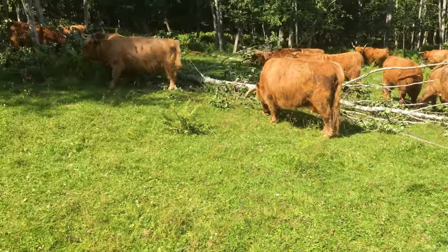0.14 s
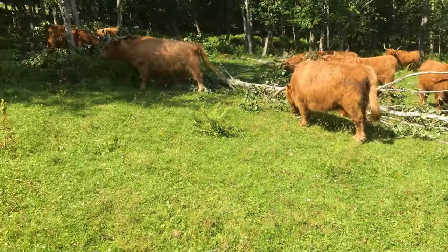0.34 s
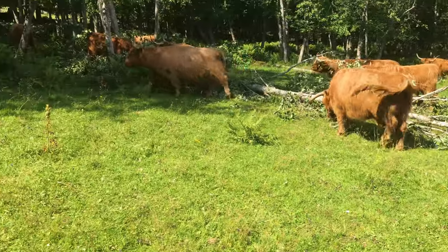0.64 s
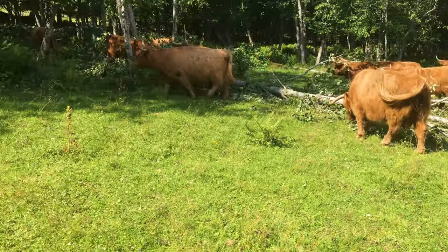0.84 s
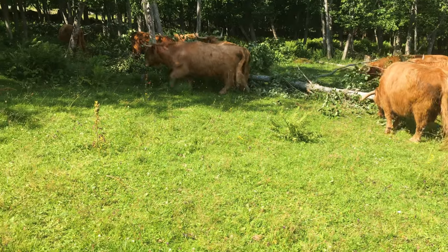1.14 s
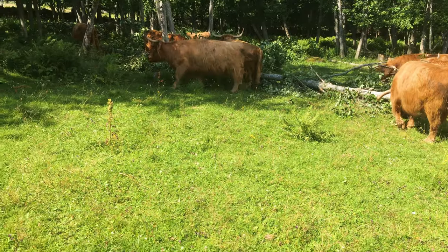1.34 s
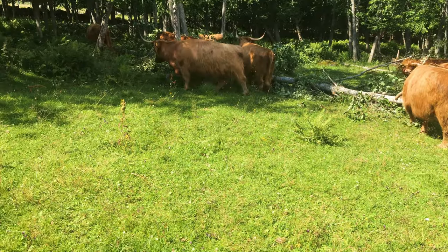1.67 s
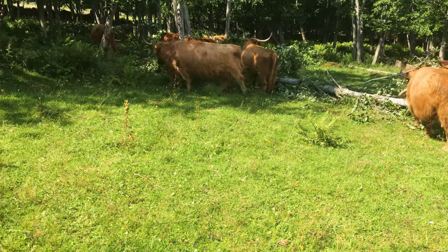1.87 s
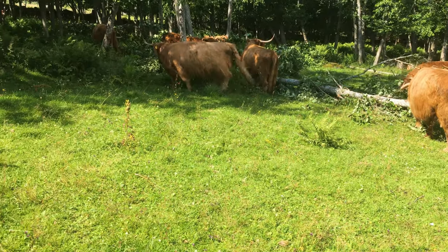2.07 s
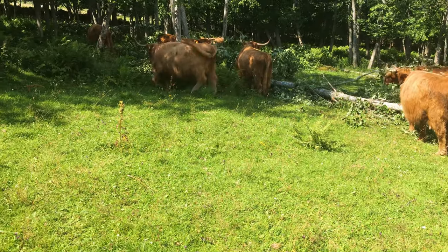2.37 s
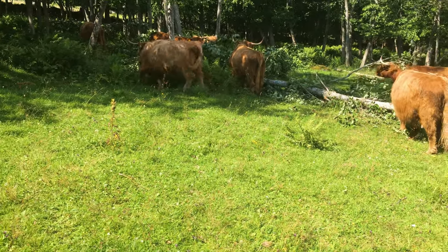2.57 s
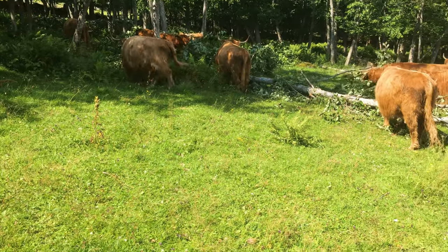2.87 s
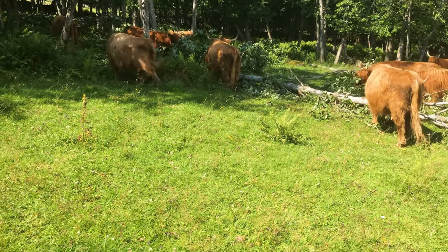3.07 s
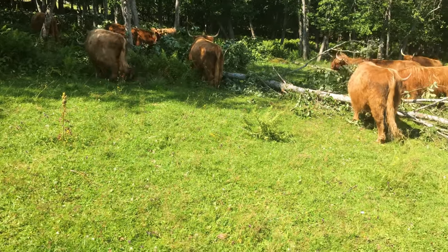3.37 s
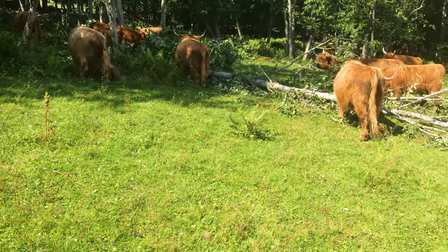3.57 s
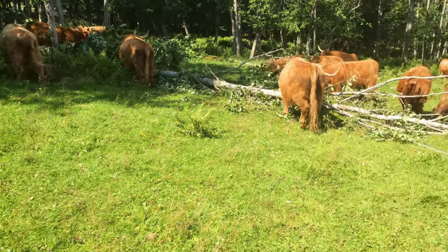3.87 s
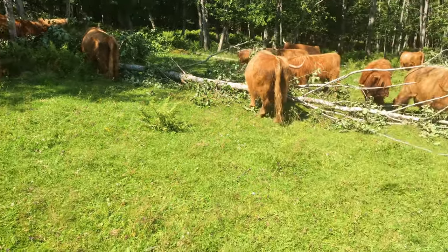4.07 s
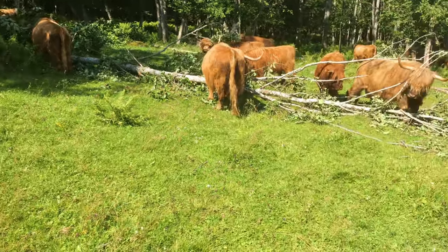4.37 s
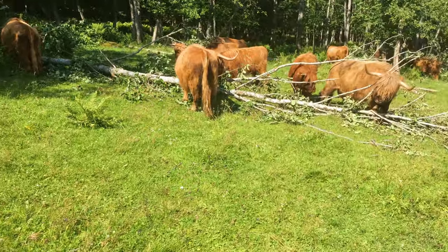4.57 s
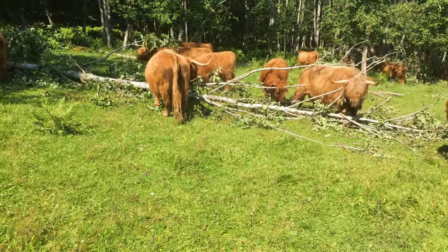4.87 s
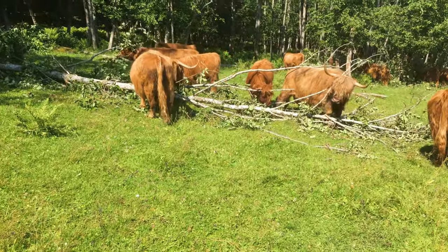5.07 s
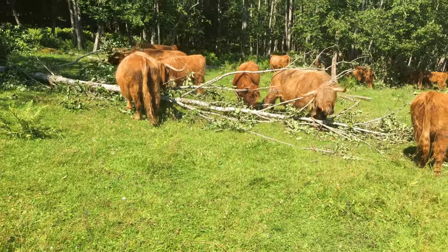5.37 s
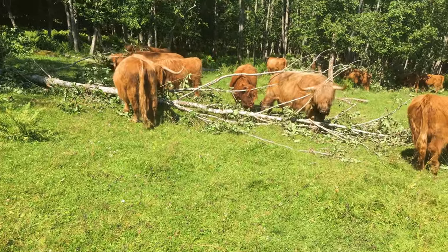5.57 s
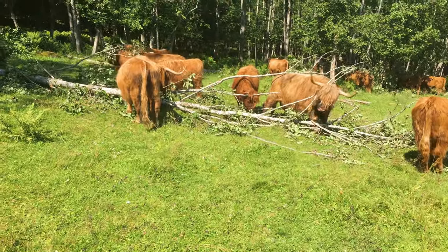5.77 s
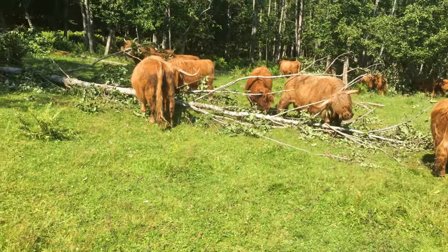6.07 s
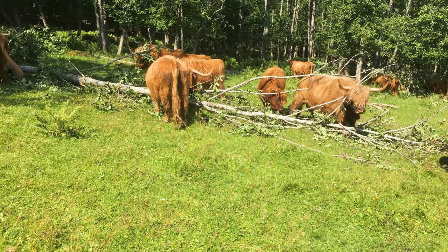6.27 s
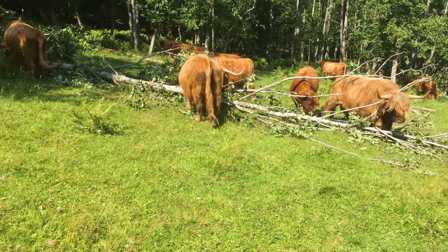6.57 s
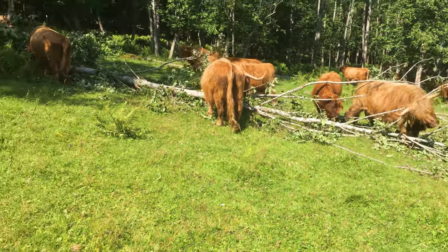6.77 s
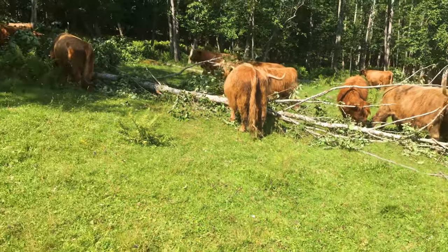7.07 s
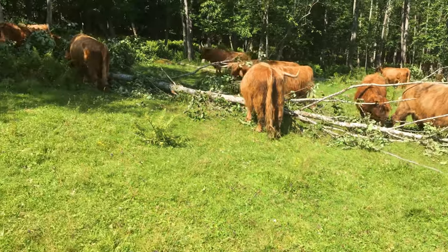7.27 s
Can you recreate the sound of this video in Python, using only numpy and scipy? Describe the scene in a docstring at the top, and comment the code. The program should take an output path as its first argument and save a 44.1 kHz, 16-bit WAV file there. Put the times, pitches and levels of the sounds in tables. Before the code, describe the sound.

Outdoors at a woodland edge, a herd browses on fallen branches. Continuous leaf rustle rises and falls with each pull, over faint wind rumble and muffled hoof treads. Hollow wooden clacks and brittle snaps break through irregularly: a sharp crack at the start, busy knocking in the middle, a quieter gap, then more cracks and thumps towards the end. The sound is mono-like, natural, with a slight dull tail from the trees.

```python
"""Pasture at the edge of a wood: cattle browse on felled leafy trees, in light air.
Foliage swishes under each tug (coloured noise and ringing leaf grains), stalks tick as they tear.
Hooves shuffle on turf (noise in timed swells); limbs knock dully and dry twigs snap (bursts into resonances).
The wood returns a faint tail of knocks and snaps. Both channels are the same."""
import sys
import numpy as np
from scipy import signal
from scipy.fft import rfft, irfft, next_fast_len
from scipy.io import wavfile

SR = 44100
rng = np.random.default_rng(int(sys.argv[2]) if len(sys.argv) > 2 else 0)


def master_out(mix):
    """Clip the mix to full scale and print it as 16-bit PCM to the path in sys.argv[1]."""
    frames = np.transpose(np.atleast_2d(mix))
    ceiling = np.clip(frames, -1, 1)
    pcm = np.round(ceiling * 32767).astype(np.int16)
    wavfile.write(sys.argv[1], SR, pcm)


N = 328104


def from_db(db):
    """Decibels to gain."""
    return 10 ** (np.asarray(db) / 20)


def rms_one(x):
    """Scale to unit rms."""
    return x / np.sqrt(np.mean(x ** 2) + 1e-20)


def unit_energy(x):
    """Scale to the energy of one unit click."""
    return x / np.sqrt(np.sum(x ** 2))


def with_level(x, db, seconds):
    """Give a blow the energy of a sound of that level and length."""
    return x * from_db(db) * np.sqrt(seconds * SR / np.sum(x ** 2))


def add(out, start_s, sound):
    """Mix a sound in at its start time."""
    start = max(round(start_s * SR), 0)
    out[start:start + len(sound)] += sound[:N - start]


def gain_at(spectrum, hz):
    """Gain of a spectrum, joined on a log-frequency axis."""
    points_hz, level_db = np.transpose(spectrum)
    return from_db(np.interp(np.log(hz + 1), np.log(points_hz), level_db))


def colour(x, spectrum):
    """Causal (minimum-phase) filter with the given spectrum, by folding the cepstrum."""
    size = 2 * next_fast_len(len(x))
    bins_hz = np.arange(size // 2 + 1) * SR / size
    cepstrum = irfft(np.log(gain_at(spectrum, bins_hz)))
    cepstrum[1:size // 2] *= 2
    cepstrum[size // 2 + 1:] = 0
    response = np.exp(rfft(cepstrum))
    return irfft(rfft(x, size) * response)[:len(x)]


def lowpass(x, order, hz):
    """Butterworth low-pass, corner held below SR / 3."""
    return signal.sosfilt(signal.butter(order, min(hz, SR / 3), fs=SR, output="sos"), x)


def resonate(x, hz, q):
    """One resonance, hz / q wide."""
    r = np.exp(-np.pi * hz / q / SR)
    return signal.lfilter([1, 0, -1], [1, -2 * r * np.cos(2 * np.pi * hz / SR), r * r], x)


def drift(rate_hz):
    """Smooth chance of unit rms, heading for a new random value rate_hz times a second."""
    knots = rng.standard_normal(4000)
    return rms_one(np.interp(np.arange(N) / SR * rate_hz, np.arange(len(knots)), knots))


def burst(t, t60_s):
    """Noise that starts at once and dies away."""
    return rng.standard_normal(len(t)) * from_db(-60 * t / t60_s)


def swells(peak_s, rise_s, fall_s, levels_db, floor_db):
    """Level in dB of swells over a floor: each grows until its peak and dies away; powers add."""
    roundness = 1.18  # top of a swell: 1 pointed, 2 bell-shaped
    t = np.arange(0, N, 128)[:, None] / SR
    distance = np.maximum((peak_s - t) / rise_s, (t - peak_s) / fall_s)
    envelopes = np.exp(-distance ** roundness)
    power = from_db(floor_db) ** 2 + envelopes ** 2 @ from_db(levels_db) ** 2
    return np.interp(np.arange(N) / SR, t[:, 0], 10 * np.log10(power))


def air(gust_db):
    """Light wind: a low rumble and the faint hush of the trees, as noise of drifting level."""
    # wind spectrum: f/Hz, relative level/dB
    air_spectrum = [(20, -38), (35, -17), (52, 2.5), (80, -3.5), (130, -7.5), (250, -13.5), (500, -19),
                    (1000, -19.5), (2000, -17.5), (5000, -20), (16000, -59)]
    level_db = -62 + gust_db * drift(rate_hz=5.7)
    return from_db(level_db) * rms_one(colour(rng.standard_normal(N), air_spectrum))


def pulling():
    """Each tug swells as the spray bends and settles once let go: dB of swish, leaf edges, bough drag."""
    # tugs at sprays: hardest pull t/s, swell/s, settle/s, swish level/dB,
    # crisp leaf edges re swish/dB, bough drag re swish/dB; levels before the layer trims
    tug_rows = [(-0.004, 0.036, 0.035, -58, -5, -14.5), (0.287, 0.073, 0.12, -51.5, -8.5, -8.5),
                (0.456, 0.034, 0.19, -60.0, -9, -5.0), (0.609, 0.008, 0.024, -44.5, -6, -6),
                (0.674, 0.034, 0.215, -53.0, -6.5, -12), (1.172, 0.013, 0.16, -60.5, -3.5, -5),
                (1.506, 0.026, 0.073, -54, -9, -3.0), (1.651, 0.06, 0.136, -52.5, -10, -10.5),
                (1.984, 0.013, 0.2, -57.5, -5.5, -3), (2.276, 0.19, 0.17, -54.5, -10, -4.5),
                (2.493, 0.076, 0.15, -53.5, -13.0, -7), (2.664, 0.075, 0.106, -53.5, -14.0, -3.0),
                (2.785, 0.026, 0.18, -54, -19, -6), (3.412, 0.036, 0.046, -54, -6, -9),
                (3.56, 0.17, 0.2, -53, -13, -5), (3.657, 0.046, 0.038, -52, -7, -11),
                (4.116, 0.079, 0.28, -56, -11, -2.5), (4.37, 0.068, 0.066, -49, -7.5, -5.5),
                (4.666, 0.012, 0.033, -67, 5, -10.5), (5.152, 0.32, 0.21, -53.0, -8.5, -5.0),
                (5.344, 0.055, 0.083, -53.0, -12.0, -21), (5.715, 0.26, 0.083, -56, -7.5, -2),
                (5.849, 0.063, 0.24, -49.5, -8, -3.5), (6.155, 0.091, 0.19, -60.5, -7, 3.5),
                (6.326, 0.073, 0.099, -53.0, -7, -12), (6.439, 0.058, 0.121, -56, -7.0, -7),
                (6.768, 0.39, 0.12, -57.5, -7.0, -3.5), (7.126, 0.046, 0.154, -59.5, -9, -8),
                (7.361, 0.16, 0.12, -54.5, -8.5, -7)]
    # the rest of the herd keeps the leaves astir; crisp and drag re the floor
    floor_db, floor_crisp_db, floor_drag_db = -61.5, -11.5, -6
    peak_s, rise_s, fall_s, swish_db, crisp_db, drag_db = np.transpose(tug_rows)
    return (swells(peak_s, rise_s, fall_s, swish_db, floor_db),
            swells(peak_s, rise_s, fall_s, swish_db + crisp_db, floor_db + floor_crisp_db),
            swells(peak_s, rise_s, fall_s, swish_db + drag_db, floor_db + floor_drag_db))


def leaf_grains(per_s, spread_db, hiss_db):
    """Countless leaves brush into a hiss; single leaves flick out of it, each at one of 12 pitches."""
    sizes = from_db(spread_db * np.minimum(rng.exponential(1, N), 4)) * rng.choice([-1, 1], N)
    flicks = sizes * (rng.random(N) < per_s / SR)
    pitches_hz = np.geomspace(2200, 14000, 12)
    dealt = rng.choice(len(pitches_hz), N, p=pitches_hz / pitches_hz.sum())
    grains = 0
    for k, hz in enumerate(pitches_hz):
        grains = grains + resonate(flicks * (dealt == k) + 1e-18, hz, q=5.5)
    return rms_one(grains) + from_db(hiss_db) * rng.standard_normal(N)


def foliage(pull, flutter_db, swish_trim_db, crisp_trim_db, drag_trim_db):
    """A harder pull makes more leaves touch; the level flutters as the sprays swing."""
    # spectra of swish, crisp leaf edges, bough drag: f/Hz, relative level/dB
    leaf_spectrum = [(500, -23), (1300, -7), (2100, -2.5), (3000, -1.5), (4000, 0.5), (4900, -3),
                     (6000, 0.5), (7500, -3), (9200, -1.5), (10500, -13), (16000, -33)]
    edge_spectrum = [(5000, -20), (8500, -4), (10400, -2.5), (11800, 1), (14000, -3.5), (16000, -4.5)]
    bough_spectrum = [(200, -17), (600, 2.5), (1200, 0.5), (2000, 0.5), (3500, -23.5), (10000, -36)]
    swish_db, crisp_db, drag_db = pull
    per_s = 4000 * from_db(swish_db - swish_db.mean())
    flutter = from_db(flutter_db * drift(rate_hz=90))
    layers = [(swish_db + swish_trim_db, leaf_spectrum),
              (crisp_db + crisp_trim_db, edge_spectrum),
              (drag_db + drag_trim_db, bough_spectrum)]
    out = 0
    for level_db, spectrum in layers:
        grains = leaf_grains(per_s, spread_db=3.0, hiss_db=5.0) * flutter
        out = out + from_db(level_db) * rms_one(colour(grains, spectrum))
    return out


def leaf_ticks(pull, per_s, spread_db, tick_db):
    """Now and then a leaf stalk tears with a tiny bright tick, more often under a hard pull."""
    # spectrum of a tearing stalk: f/Hz, relative level/dB
    tick_spectrum = [(800, -27), (3000, 0), (6000, -9), (10000, -2), (16000, -7)]
    swish_db = pull[0]
    torn = rng.random(N) < per_s * from_db(swish_db - swish_db.mean()) / SR
    sizes = from_db(tick_db + spread_db * rng.uniform(-1, 1, N)) * rng.choice([-1, 1], N)
    tear = unit_energy(burst(np.arange(SR // 100) / SR, t60_s=0.008))
    return colour(signal.fftconvolve(torn * sizes, tear)[:N], tick_spectrum)


def stepping():
    """Every hoof presses and releases alike: dB of tread and of rumble."""
    # hooves taking weight: t/s, tread level/dB, deep rumble level/dB; levels before the layer trims
    step_rows = [(0.02, -62.5, -58), (0.28, -58.5, -56.5), (0.38, -59, -56.5), (0.56, -48, -60),
                 (0.68, -48.5, -52.5), (1.0, -57, -56.5), (1.31, -56, -55), (1.54, -53, -55),
                 (1.87, -58.5, -59), (2.04, -49, -67), (2.2, -62, -53.0), (2.31, -56, -53.5),
                 (2.43, -60, -59.0), (2.5, -49, -64.5), (2.67, -52, -55.5), (2.78, -65, -59),
                 (2.95, -55, -57), (3.19, -57.5, -74), (3.47, -50.5, -60.5), (3.72, -80, -66),
                 (3.96, -64, -60.5), (4.12, -49.5, -67), (4.21, -55.5, -56.5), (4.34, -56.0, -63),
                 (4.59, -62.5, -59), (4.93, -60.0, -68), (5.08, -59, -61.5), (5.24, -55, -58),
                 (5.55, -55, -57), (5.68, -51, -61.0), (5.84, -51.0, -56), (6.0, -53.5, -56.5),
                 (6.17, -60, -54.0), (6.34, -51.5, -64.5), (6.42, -57, -60.5), (6.64, -56, -55.5),
                 (6.78, -54, -60.5), (6.94, -73, -58.5), (7.11, -70, -78), (7.34, -57.5, -67.5)]
    press_s, release_s = 0.046, 0.068
    tread_floor_db, rumble_floor_db = -66, -72.5  # far cattle shifting their weight
    peak_s, tread_db, rumble_db = np.transpose(step_rows)
    return (swells(peak_s, press_s, release_s, tread_db, tread_floor_db),
            swells(peak_s, press_s, release_s, rumble_db, rumble_floor_db))


def shuffling(lumps_db, tread_trim_db, rumble_trim_db):
    """Hooves and flanks press on soft turf: an uneven low murmur over a deep rumble."""
    # spectra of turf and rumble: f/Hz, relative level/dB
    turf_spectrum = [(60, -17.5), (130, -2), (200, 1.5), (320, -2), (460, -6), (530, -16), (750, -19),
                     (2000, -36), (8000, -72)]
    rumble_spectrum = [(20, -21), (38, -7), (54, 1), (100, -1.5), (150, -8), (300, -21), (2000, -81)]
    tread_db, rumble_db = stepping()
    lumps = from_db(lumps_db * drift(rate_hz=40))
    murmur = rms_one(colour(rng.standard_normal(N) * lumps, turf_spectrum))
    deep = rms_one(colour(rng.standard_normal(N) * lumps, rumble_spectrum))
    return from_db(tread_db + tread_trim_db) * murmur + from_db(rumble_db + rumble_trim_db) * deep


def strike(t, t60_s, click_db):
    """A single sharp click leading a burst of fine debris; click_db weighs one against the other."""
    return unit_energy(burst(t, t60_s)) + from_db(click_db) * (t == 0) * rng.choice([-1, 1])


def stick(shake, hz, q, ratio, other_db):
    """A piece of wood rings at its pitch and, more weakly, at one other bending mode."""
    other = resonate(shake, min(ratio * hz, SR / 3), q)
    return resonate(shake, hz, q) + from_db(other_db) * other


def thud(t, pitch_hz, t60_s, swell_cycles, low_linger, mode_q, focus_db):
    """The limb's modes, strongest near the blow's pitch; low ones build up later and last longer."""
    # low modes of a heavy limb: f/Hz, level before focus/dB
    limb_modes = [(90, -7), (130, 0.5), (185, 0.5), (240, -1), (275, -4), (325, -1.5), (368, -0.5),
                  (415, 0), (460, 1), (560, -7.5), (650, 2.5), (800, -10.5), (980, 5.5)]
    out = 0
    for hz, level_db in limb_modes:
        build_up = 1 - np.exp(-t * hz / swell_cycles)
        shake = burst(t, t60_s * (pitch_hz / hz) ** low_linger) * build_up
        mode = resonate(resonate(shake, hz, mode_q), hz, q=0.96)
        off_pitch_octaves = np.log2(hz / pitch_hz)
        out = out + rms_one(mode) * from_db(level_db - focus_db * off_pitch_octaves ** 2)
    return out


def knocks(clack_t60_s, clack_width_hz, scuff_db, thud_trim_db, clack_trim_db):
    """Limbs knock on trunks and under hooves: the bark clacks, the heavy limb sounds its low thud."""
    # knocks: t/s, thud level/dB, clack level/dB, clack f/Hz, thud f/Hz, t60 of scuff and of thud at its f/s;
    # levels before the trims
    knock_rows = [(0.265, -43, -50, 740, 290, 0.074), (0.352, -48, -49.5, 1010, 366, 0.17),
                  (0.543, -47, -61, 755, 257, 0.045), (0.68, -52, -63, 2300, 270, 0.1),
                  (0.705, -48.5, -53, 750, 305, 0.39), (0.864, -53, -54.5, 1350, 287, 0.11),
                  (1.039, -54, -69, 810, 250, 0.14), (1.453, -49, -59, 910, 320, 0.21),
                  (1.532, -42, -46.5, 730, 424, 0.066), (1.79, -53, -60, 745, 480, 0.31),
                  (1.9866, -41.5, -37, 1280, 540, 0.15), (2.271, -42.5, -42.5, 1030, 454, 0.2),
                  (2.436, -45.5, -42.5, 920, 450, 0.18), (2.472, -47, -47, 750, 380, 0.12),
                  (2.492, -40, -48, 755, 365, 0.19), (2.505, -53, -45, 870, 360, 0.17),
                  (2.523, -40, -44, 764, 350, 0.095), (2.65, -45, -39, 1000, 268, 0.053),
                  (2.773, -50, -47, 1700, 450, 0.048), (2.953, -47.5, -71, 2450, 240, 0.13),
                  (3.131, -57.5, -54, 1730, 310, 0.16), (3.459, -53.5, -59, 2050, 288, 0.051),
                  (3.529, -48.5, -38.5, 1970, 318, 0.075), (4.0905, -49.5, -41, 1540, 310, 0.056),
                  (4.188, -51, -61, 2230, 340, 0.05), (4.286, -52, -52.5, 884, 340, 0.22),
                  (4.826, -56.5, -53.5, 1140, 300, 0.077), (4.887, -59, -54, 1130, 310, 0.084),
                  (4.951, -49.5, -68, 750, 380, 0.055), (5.319, -69, -41.5, 1850, 360, 0.14),
                  (5.403, -49.5, -66, 1960, 380, 0.048), (5.55, -49.5, -54.5, 780, 290, 0.05),
                  (5.67, -43.5, -51, 900, 288, 0.07), (5.82, -60, -48, 2100, 340, 0.05),
                  (5.828, -41.5, -41.5, 1060, 343, 0.13), (5.86, -57, -66, 2330, 270, 0.12),
                  (6.025, -62, -51.5, 1560, 290, 0.12), (6.151, -54, -55, 900, 350, 0.049),
                  (6.623, -48.5, -49.5, 1100, 266, 0.12), (6.721, -42.5, -39, 1180, 384, 0.085),
                  (6.787, -52, -51, 1670, 260, 0.068), (7.318, -46, -41.5, 1200, 438, 0.088)]
    out, t = np.zeros(N), np.arange(SR // 4) / SR
    for start_s, thud_db, clack_db, clack_hz, thud_hz, t60_s in knock_rows:
        scuff = from_db(scuff_db) * unit_energy(burst(t, t60_s))
        shake = strike(t, clack_t60_s, click_db=-3) + scuff
        # all clacks ring about equally long, so the high ones are the most clearly pitched
        clack = stick(shake, clack_hz, clack_hz / clack_width_hz, ratio=0.62, other_db=-13.0)
        clack = lowpass(clack, order=2, hz=3.9 * clack_hz)
        body = thud(t, thud_hz, t60_s, swell_cycles=0.037, low_linger=0.83, mode_q=7.5, focus_db=6.5)
        knock = with_level(clack, clack_db + clack_trim_db, seconds=0.0094)
        add(out, start_s, knock + with_level(body, thud_db + thud_trim_db, seconds=0.024))
    return out


def snaps(crack_t60_s, tail_t60_s, tail_trim_db, ring_trim_db, crack_trim_db):
    """A dry fibre parts in a sharp crack, splinters fizz on after it, and the twig rings briefly."""
    # breaking wood fibres: t/s, twig ring level/dB, twig f/Hz, ring Q, crack level/dB,
    # splinter tail re debris burst/dB; levels before the trims
    snap_rows = [(0.3075, -40.5, 4240, 6.9, -52, 7), (0.421, -42, 7900, 5, -51, -5),
                 (0.4326, -42, 9200, 3.7, -41, -7), (0.5948, -31, 11200, 5, -25.5, 2),
                 (0.5987, -43, 5400, 5, -30, 4), (0.6024, -33.5, 3170, 4.9, -30, -3),
                 (0.606, -45, 5640, 5, -33, -6), (0.6947, -40, 11400, 5, -43, -7),
                 (0.722, -47, 2100, 9.5, -39, -5), (1.474, -37, 3540, 3, -51, -4),
                 (2.2063, -44, 11060, 5, -48, -13), (2.2389, -45, 11840, 5, -53, -1),
                 (2.2437, -30.5, 9600, 2.6, -40, 2), (2.2512, -46, 8940, 5, -36.5, 5),
                 (2.7735, -25.5, 2500, 3.5, -32, -3), (3.385, -33.5, 6500, 9, -52, 10),
                 (3.6449, -42, 3760, 6, -38.5, -3), (4.111, -46, 5660, 18, -55, -2),
                 (4.3262, -33.5, 6300, 3.4, -29, 0), (4.3355, -31.5, 6130, 2.9, -29, -6),
                 (4.342, -41, 8770, 8, -44, -9), (5.3198, -27.5, 5950, 3.9, -53, -7),
                 (5.8267, -25.5, 4430, 5.4, -37, -16), (5.828, -27.5, 11600, 4.3, -22, -9),
                 (5.8335, -46, 6730, 5, -29.5, -10), (5.8627, -50, 6800, 5, -46, -10),
                 (6.7892, -45, 5310, 4.5, -40.5, -5)]
    # spectrum of a parting fibre: f/Hz, relative level/dB
    crack_spectrum = [(400, -9.5), (1200, -4), (2300, -0.5), (3300, -1), (4400, 1), (7000, 0.5), (9000, 1),
                      (12000, -2.5), (14000, -5.5), (16000, -12)]
    out, t = np.zeros(N), np.arange(SR // 16) / SR
    for start_s, ring_db, hz, q, crack_db, tail_db in snap_rows:
        splinters = from_db(tail_db + tail_trim_db) * unit_energy(burst(t, tail_t60_s))
        shake = strike(t, crack_t60_s, click_db=1.0) + splinters
        ring = stick(shake, hz, q, ratio=1.69, other_db=-12.5)
        crack = colour(strike(t, crack_t60_s, click_db=-9) + splinters, crack_spectrum)
        snap = with_level(ring, ring_db + ring_trim_db, seconds=0.0033)
        add(out, start_s, snap + with_level(crack, crack_db + crack_trim_db, seconds=0.002))
    return out


def wood_edge(x, t60_s, wet_db, dull_hz):
    """Trunks and crowns scatter back a faint, dull tail."""
    t = np.arange(SR) / SR
    echoes = burst(t, t60_s) * (1 - np.exp(-t / 0.063))
    echoes = lowpass(unit_energy(echoes), order=1, hz=dull_hz)
    return x + from_db(wet_db) * signal.fftconvolve(x, echoes)[:N]


def scene():
    """All sources, the same in both channels; only knocks and snaps get the wood's tail."""
    wind = air(gust_db=1.0)
    pull = pulling()
    leaves = foliage(pull, flutter_db=1.38, swish_trim_db=0.5, crisp_trim_db=2.5, drag_trim_db=0)
    ticks = leaf_ticks(pull, per_s=42, spread_db=4, tick_db=-34.5)
    ground = shuffling(lumps_db=2.5, tread_trim_db=0.5, rumble_trim_db=3)
    limbs = knocks(clack_t60_s=0.03, clack_width_hz=360, scuff_db=-9.5, thud_trim_db=0.0, clack_trim_db=0.5)
    twigs = snaps(crack_t60_s=0.0081, tail_t60_s=0.03, tail_trim_db=-1.5, ring_trim_db=0.0,
                  crack_trim_db=-1.5)
    wood = wood_edge(limbs + twigs, t60_s=0.9, wet_db=-20.5, dull_hz=4000)
    mono = wind + leaves + ticks + ground + wood
    return np.array([mono, mono])


def record(dry):
    """Steep elliptic low-pass: the top is cut."""
    cutoff_hz, ripple_db, stop_db = 15850, 0.2, 70
    return signal.sosfilt(signal.ellip(10, ripple_db, stop_db, cutoff_hz, fs=SR, output="sos"), dry)


dry = scene()
out = record(dry)
master_out(out)
```